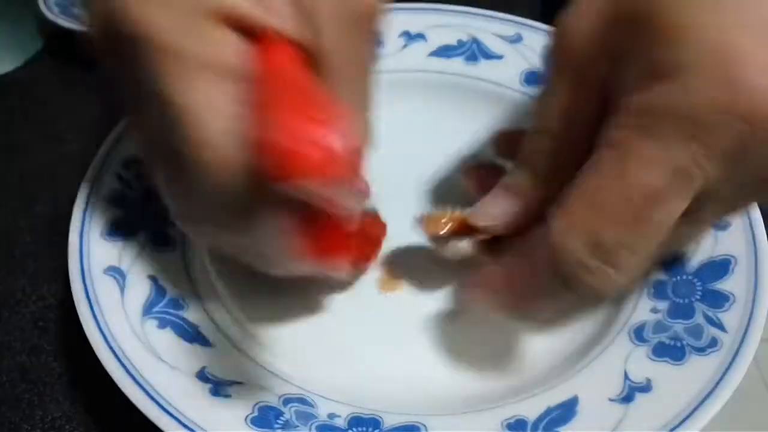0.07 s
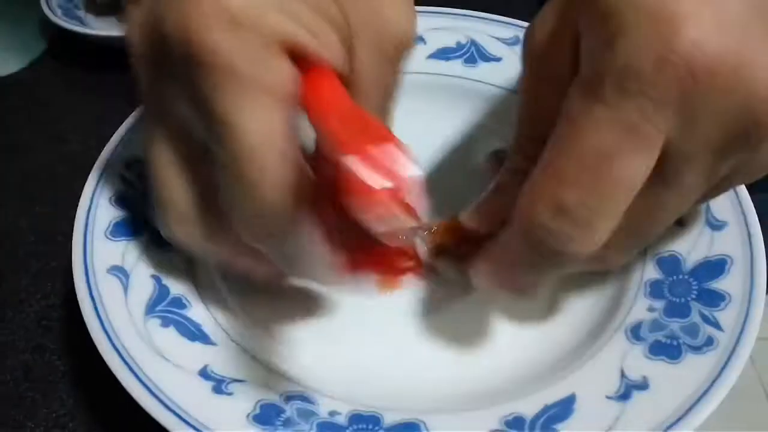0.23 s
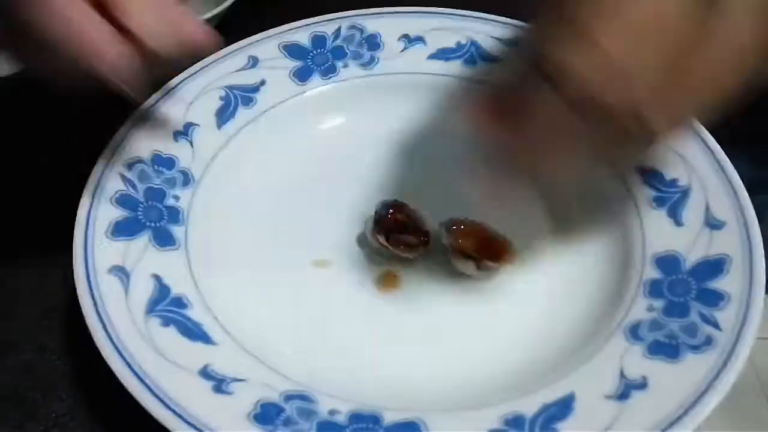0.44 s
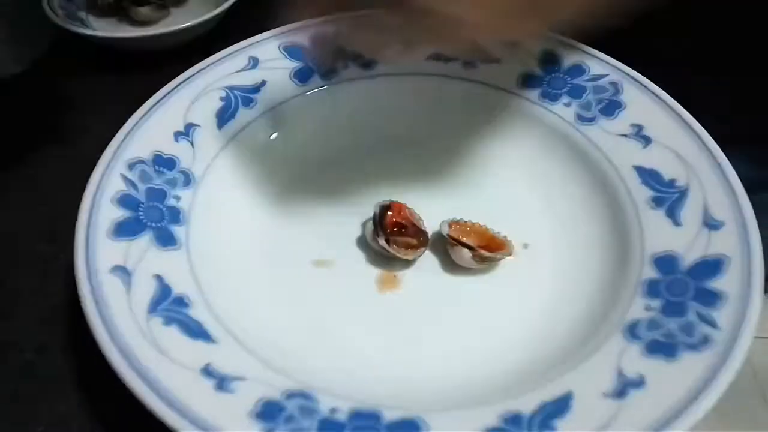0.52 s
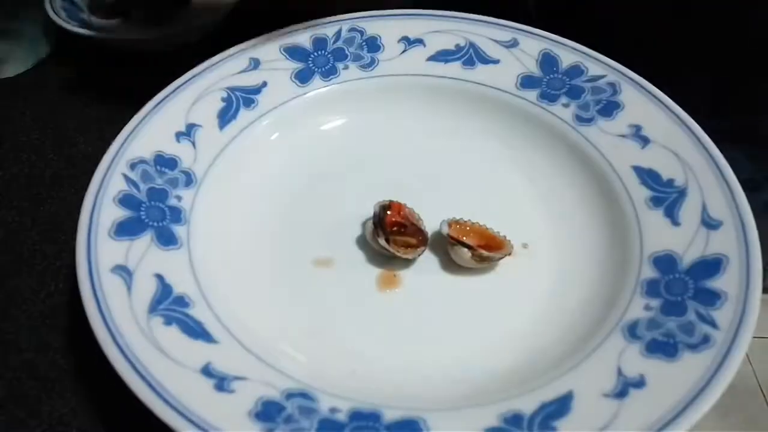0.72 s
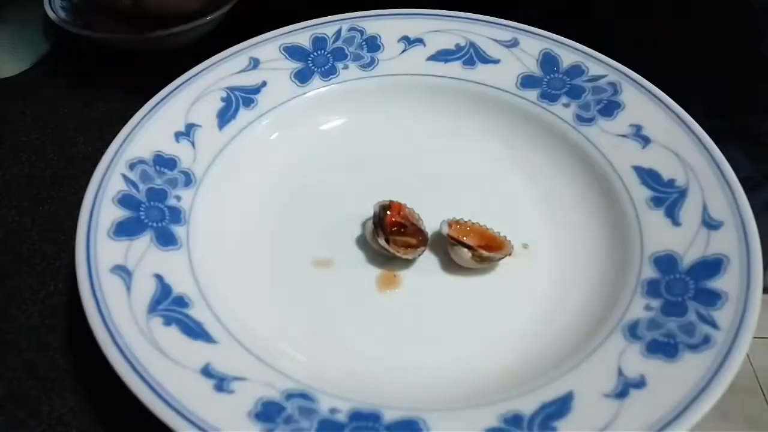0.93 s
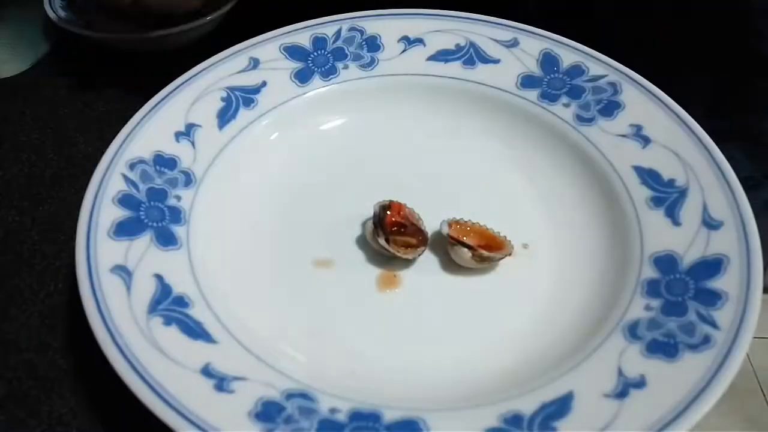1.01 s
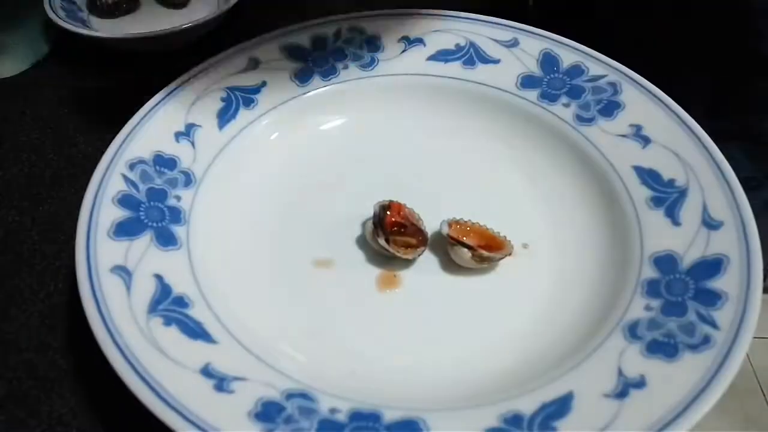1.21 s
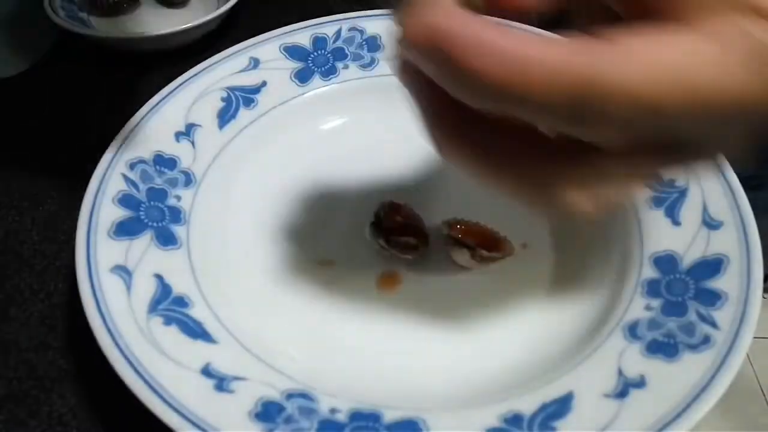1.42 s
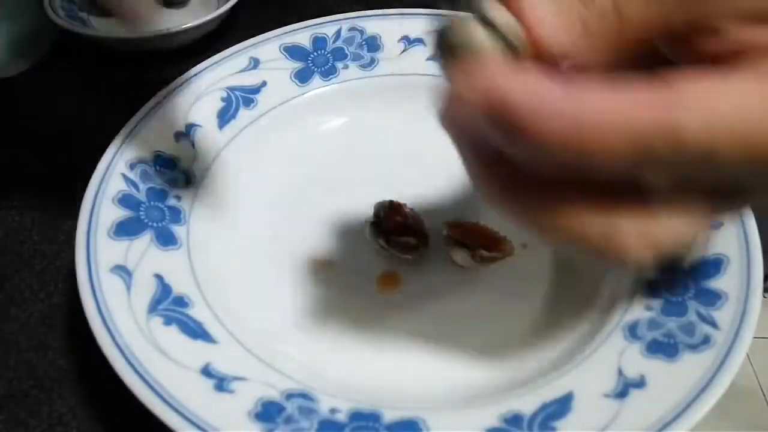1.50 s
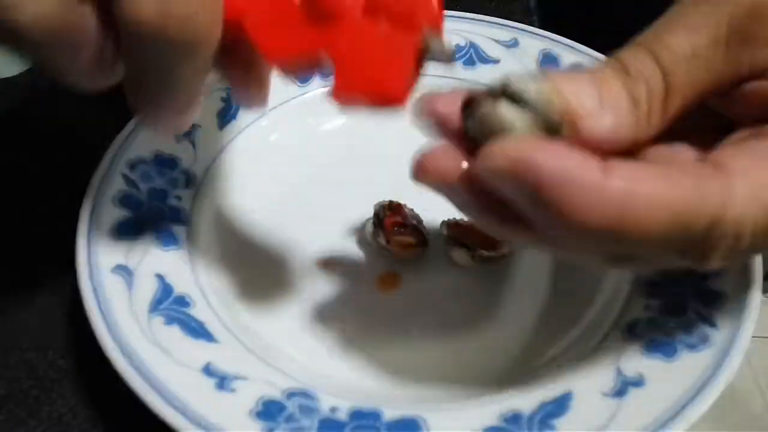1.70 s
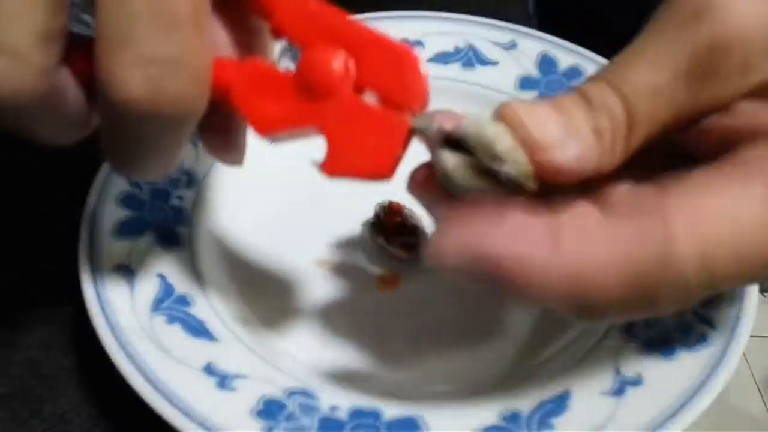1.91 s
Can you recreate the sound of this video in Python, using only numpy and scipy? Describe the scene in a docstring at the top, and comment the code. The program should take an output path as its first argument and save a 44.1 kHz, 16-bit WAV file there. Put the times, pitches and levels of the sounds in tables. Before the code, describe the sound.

Sharp ringing clinks sound close by as pliers and a shell knock on a ceramic plate. The shell drops, chatters and settles. A few faint ticks follow from further off, over a quiet low hum in a small hard room.

```python
"""In a small hard room, cockle shells are pried apart with small pliers on a ceramic plate. Tool and shell
knock on it, then a shell drops, chatters and settles. Each impact gives a broadband click and sets the
plate and the room around it ringing. Later a few faint ticks come from a bowl further off and
the pliers slide on to the next shell, all over a wavering low hum and hiss."""
import sys
import numpy as np
from scipy import signal
from scipy.fft import rfft, irfft, next_fast_len
from scipy.io import wavfile
from scipy.ndimage import uniform_filter1d, minimum_filter1d, map_coordinates

SR = 44100
rng = np.random.default_rng(int(sys.argv[2]) if len(sys.argv) > 2 else 0)


def generate_wav(signal):
    """Clip the signal to [-1, 1] and save it as 16-bit WAV at the path in sys.argv[1]."""
    frames = np.transpose(np.atleast_2d(signal))
    scaled = np.clip(frames, -1, 1) * 32767
    pcm = np.round(scaled).astype(np.int16)
    wavfile.write(sys.argv[1], SR, pcm)


N = 85995
TOP_HZ = 15500

# Likeness of the two ears for rumble, hiss and rub: frequency_hz, correlation
EAR_COHERENCE = [(100, 1), (250, 0.92), (600, .4), (2000, .2), (8000, 0.034)]


def amp(db):
    """Decibels to amplitude ratio."""
    return 10 ** (np.asarray(db) / 20)


def unit(x):
    """Normalisation to rms 1."""
    return x / np.sqrt(np.mean(x ** 2) + 1e-20)


def along(points, hz):
    """Interpolation of (frequency_hz, value) points on a logarithmic axis."""
    f, v = np.transpose(points)
    return np.interp(np.log(hz + 1), np.log(f + 1), v)


def envelope(points):
    """Amplitude envelope through (time_s, level_db) points."""
    return amp(np.interp(np.arange(N) / SR, *np.transpose(points)))


def wobble(rate):
    """Smooth random modulation: a spline with rate knots a second."""
    return map_coordinates(rng.standard_normal(int(N * rate / SR) + 4), [np.arange(N) * rate / SR])


def since(start_s):
    """Seconds since an onset, zero before it."""
    return np.maximum(np.arange(N) / SR - start_s, 0)


def sides(difference):
    """An interaural difference: plus half to the left, minus half to the right."""
    return np.array([[.5], [-.5]]) * difference


def filtered(x, response):
    """Linear filtering: the spectrum times a frequency response."""
    size = next_fast_len(N + SR // 4)
    return irfft(rfft(x, size) * response(np.fft.rfftfreq(size, 1 / SR)), size)[..., :N]


def minimum_phase(gain):
    """The causal response with these gains, by folding the cepstrum."""
    cepstrum = irfft(np.log(gain))
    half = cepstrum.shape[-1] // 2
    cepstrum[..., 1:half] *= 2
    cepstrum[..., half + 1:] = 0
    return np.exp(rfft(cepstrum))


def lowpass(x, hz):
    """Sixth-order roll-off above hz."""
    return signal.sosfilt(signal.butter(6, hz, fs=SR, output="sos"), x)


def noise(spectrum, coherence):
    """Partly coherent stereo noise of rms 1: the mid-to-side ratio sets the correlation."""
    def response(hz):
        angle = np.arccos(np.clip(along(coherence, hz), -1, 1)) / 2
        return amp(along(spectrum, hz)) * [np.cos(angle), np.sin(angle)]
    mid, side = filtered(rng.standard_normal((2, N)), response)
    return unit(np.array([mid + side, mid - side]))


def tone(hz, drift_hz, flutter_db=2.5):
    """A sinusoid of rms 1 under random amplitude and frequency modulation."""
    flutter = amp(flutter_db * wobble(18))
    phase = 2 * np.pi * np.cumsum(hz + drift_hz * wobble(22)) / SR
    return unit(flutter * np.sin(phase))


def background():
    """Superposition of a swelling hum, low drones, a faint whine, room rumble and hiss."""
    # Envelopes: time_s, level_db
    hum_level = [(0, -45.5), (.23, -47), (.31, -61.5), (.56, -57), (.75, -67.5), (1.04, -58.5), (1.15, -73),
                 (1.42, -48.5), (1.52, -72), (1.8, -54.5), (1.95, -74.5)]
    whine_level = [(0, -69), (.7, -68.5), (.9, -58.5), (1.05, -73), (1.42, -62), (1.6, -69.5),
                   (1.73, -64.5), (1.95, -69)]
    rumble_level = [(0, -51.5), (.3, -52.5), (.75, -55), (1.4, -55.5), (1.95, -54.5)]
    hiss_level = [(0, -62), (.25, -62), (.75, -65), (.93, -67.5), (.96, -62.5), (1.5, -64.5), (1.95, -64)]
    # Sustained tones: pitch_hz, level_db
    drone_tones = [(68, -67.5), (113, -61.5)]
    # Noise spectra: frequency_hz, gain_db
    rumble_spectrum = [(12, -47), (20, -17.5), (81, -13), (120, -1.5), (168, -12), (227, -13), (264, -14),
                       (350, -17), (384, -13.5), (422, -13), (455, -15.5), (967, -20.5), (1800, -32),
                       (2340, -60), (3960, -120)]
    hiss_spectrum = [(300, -5.5), (1500, 2.5), (2500, -2.5), (4000, -2), (6000, -0.5), (7200, -13.5),
                     (8500, -17), (12000, -27), (15500, -29.5)]
    # Balance of the low sounds: frequency_hz, left_minus_right_db
    balance = [(60, -1.5), (130, 4.5), (280, -1)]
    hum = envelope(hum_level) * tone(136.7, drift_hz=5)
    drones = sum(amp(db) * tone(hz, drift_hz=5) for hz, db in drone_tones)
    whine = envelope(whine_level) * tone(386.5, drift_hz=6)
    rumble = envelope(rumble_level) * noise(rumble_spectrum, EAR_COHERENCE)
    hiss = envelope(hiss_level) * noise(hiss_spectrum, EAR_COHERENCE)
    return filtered(hum + drones + whine + rumble, lambda hz: amp(sides(along(balance, hz)))) + hiss


def clicks(times, levels_db, spectrum, t60_s):
    """Impact noise: a harder contact cracks brighter, and the ribbed shell grates after each."""
    # Balance of the clicks: frequency_hz, left_minus_right_db
    balance = [(2500, 3), (5200, -6.5), (6500, 1), (8100, -5), (13000, 10.5)]
    # Likeness of the two ears: frequency_hz, correlation
    coherence = [(1000, 0.057), (3500, -0.25), (8000, 0)]
    soft_hz, hard_hz, rise_s = 8100, 15020, .0003
    scrape_db, scrape_t60_s = -14.5, .08
    force, t = np.zeros((2, N + SR)), np.arange(SR // 4) / SR
    for start_s, db in zip(times, levels_db):
        white = noise([(1, 0)], coherence)[:, :len(t)]
        hardness = amp(db - max(levels_db))
        cutoff_hz = soft_hz + (hard_hz - soft_hz) * hardness ** 3
        crack = lowpass(white * (1 - np.exp(-t / rise_s)) * amp(-60 * t / t60_s), cutoff_hz)
        grit = rng.standard_normal(white.shape) * amp(scrape_db - 60 * t / scrape_t60_s)
        force[:, round(start_s * SR):][:, :len(t)] += amp(db) * (crack + lowpass(grit, soft_hz))

    def response(hz):
        return minimum_phase(unit(amp(along(spectrum, hz) + sides(along(balance, hz)))))
    return filtered(force[:, :N], response)


def ringing(contacts, loose):
    """Damped oscillation: each contact hushes the last ring and starts anew; its spot weights the tones."""
    # Pitches that ring after each clink, from the plate and the room around it: pitch_hz
    pitches_hz = [3451, 3773, 3876, 3908, 5875, 6001, 6061, 6408, 7594, 7723, 9965, 10925, 13050, 14220,
                  15200]
    # For each pitch: t60_s, knocked_db, loose_shell_db, left_minus_right_db, left_lead_rad
    partials = [(0.057, -28.5, -24, -9, 2), (0.045, -3, -15.5, -1.5, 3.55), (.12, -6.5, -12.5, 3.5, 1.5),
                (0.084, -9, -1, -4, 2.5), (.24, -3.5, -7, 5, 2), (.15, -16.5, -11.5, 6, -3),
                (0.14, -7, -0.5, -18.5, -3), (0.31, -11, -26, 1.5, 1.8), (0.24, -0.5, -1.5, 13.5, 3.5),
                (.2, -5.5, -1.5, 7.5, 1.64), (0.24, -26, -17, 9.5, 1), (0.099, -1.5, 0, 19, 4.5),
                (.16, -4, -5.5, 9, 3.2), (.17, -10, -16, 16, 3), (.14, -14, -12.5, 13, 2)]
    # Borders of the low, middle, high and top registers: frequency_hz
    edges_hz = [5000, 7000, 10400]
    ring_db, rise_s, touch_s = 1.5, 0.00094, .003
    out, t = np.zeros((2, N + SR)), np.arange(SR // 3) / SR
    ends = [row[0] for row in contacts[1:]] + [N / SR]
    for (start_s, *register_db, _), end_s in zip(contacts, ends):
        free_s, start = end_s - start_s, round(start_s * SR)
        age = t[t < free_s + 10 * touch_s]
        attack = 1 - np.exp(-(age / rise_s) ** 2)
        damping = 1 / np.cosh(np.clip((age - free_s) / touch_s, 0, 20))
        phases = rng.uniform(0, 2 * np.pi, len(partials))
        for hz, (t60_s, knocked_db, loose_db, pan_db, lead), phase in zip(pitches_hz, partials, phases):
            db = ring_db + register_db[np.searchsorted(edges_hz, hz)] + (loose_db if loose else knocked_db)
            partial = amp(db - 60 * age / t60_s) * np.sin(2 * np.pi * hz * age + phase + sides(lead))
            out[:, start:start + len(age)] += unit(amp(sides(pan_db))) * attack * damping * partial
    return out[:, :N]


def room(x, wall_delay_s=.003):
    """Diffuse reverberation: convolution with exponentially decaying noise, one tail per ear."""
    # Reverberation time: frequency_hz, t60_s
    decay = [(300, 0.9), (2500, 0.14), (6000, 0.18), (12000, 0.15)]
    hz, t, spectra = signal.stft(rng.standard_normal((2, SR // 2)), SR, nperseg=256)
    tail = signal.istft(spectra * amp(-60 * t / along(decay, hz)[:, None]), SR, nperseg=256)[1]
    tail *= np.arange(tail.shape[1]) / SR > wall_delay_s
    return signal.fftconvolve(x, tail / np.linalg.norm(tail[0]), axes=1)[:, :N]


def clinks(contacts, spectrum, click_db, click_t60_s, loose):
    """Direct and reverberant sound of impacts on the plate, each a click and a ring."""
    click_room_db, ring_room_db = -7, -12.5
    times, *_, levels_db = np.transpose(contacts)
    click = amp(click_db) * clicks(times, levels_db, spectrum, click_t60_s)
    ring = ringing(contacts, loose)
    return click + ring + room(amp(click_room_db) * click + amp(ring_room_db) * ring)


def plier_knocks():
    """Impulsive excitation: the pliers and the held shell strike the plate."""
    # Knocks: start_s, low_ring_db, middle_ring_db, high_ring_db, top_ring_db, click_db
    knocks = [(0.2252, -37, -47, -56, -71, -50.5), (0.2325, -10, -12.5, -30.5, -44, -16.5),
              (0.2492, -13.5, -23.5, -27, -53.5, -25.5), (0.2558, -11, -20, -28.5, -54, -18.5),
              (0.2662, -10.5, -19.5, -26, -51, -20), (0.2702, -13, -18, -29, -52, -19),
              (0.319, -20, -31.5, -41.5, -77, -36.5), (0.3383, -15.5, -31, -44.5, -81, -25),
              (0.3475, -15.5, -31.5, -46, -81, -28), (0.3645, -30.5, -35.5, -50.5, -82, -31)]
    # Click spectrum: frequency_hz, gain_db
    spectrum = [(200, -29.5), (900, -22), (1750, -23), (2250, 3), (3100, -12.5), (3800, 6.5), (4800, -4),
                (5700, 2), (7200, -8.5), (8400, -23), (13000, -27), (15500, -37.5)]
    return clinks(knocks, spectrum, click_db=2.5, click_t60_s=0.023, loose=False)


def dropped_shell():
    """Inelastic collisions: the loose shell bounces and rocks to rest on the plate."""
    # Bounces: start_s, low_ring_db, middle_ring_db, high_ring_db, top_ring_db, click_db
    bounces = [(0.3848, -12.5, -12, -22, -48, -22), (0.409, -14.5, -15.5, -30, -57, -25.5),
               (0.4253, -22, -22, -39.5, -66, -30.5), (0.4365, -29, -14.5, -32, -70, -31),
               (0.456, -19, -23, -38, -67, -34), (0.465, -12.5, -17, -28.5, -51, -25),
               (0.4752, -6.5, -7, -30, -51.5, -20), (0.4973, -6.5, -14.5, -30.5, -62.5, -25),
               (0.5147, -8, -5, -25, -65.5, -27.5), (0.5293, -23, -17.5, -35.5, -77, -34.5),
               (0.572, -39, -42, -68, -90.5, -47.5), (0.604, -33, -31, -47, -82, -44),
               (0.6085, -21.5, -21.5, -58, -87, -47), (0.619, -22.5, -27.5, -46, -92, -40.5),
               (0.643, -34.5, -38, -58.5, -96, -49), (0.6755, -49.5, -46, -70, -91, -69)]
    # Click spectrum: frequency_hz, gain_db
    spectrum = [(200, -28.5), (1100, -15), (1700, -17.5), (2500, -8.5), (3700, 0.5), (4500, -4), (5700, 4),
                (7500, -8.5), (9000, -11), (11000, -31.5), (13000, -30.5), (15500, -47.5)]
    return clinks(bounces, spectrum, click_db=9, click_t60_s=0.0077, loose=True)


def bowl_ticks(ring_t60_s=0.13, room_db=-3):
    """Light impacts, each with one damped tone, as the next shell is picked from the far bowl."""
    # Ticks: start_s, click_db, ring_hz, ring_db
    ticks = [(1.036, -45, 2070, -65.5), (1.073, -49.5, 5820, -58.5), (1.152, -57.5, 3040, -60.5)]
    # Click spectrum: frequency_hz, gain_db
    spectrum = [(500, -17), (1500, -12), (2100, 11), (3200, -9), (6000, -8), (8500, -26), (10200, -14),
                (12000, -34)]
    times, levels_db, *_ = np.transpose(ticks)
    direct = clicks(times, levels_db, spectrum, t60_s=0.022)
    for start_s, _, hz, db in ticks:
        age = since(start_s)
        direct += amp(db - 60 * age / ring_t60_s) * np.sin(2 * np.pi * hz * age)
    return direct + amp(room_db) * room(direct)


def plier_rub(start_s=1.86, rise_s=0.058, level_db=-62):
    """Sliding friction: steel on the next shell gives a faint narrow band of noise."""
    # Friction spectrum: frequency_hz, gain_db
    spectrum = [(3000, -20), (4800, -9), (5900, 2), (6500, -12), (7600, -26), (12000, -45)]
    onset = np.clip(since(start_s) / rise_s, 0, 1)
    return amp(level_db + 2 * wobble(70)) * onset * noise(spectrum, EAR_COHERENCE)


def scene():
    """Superposition: the pressures of all the sources add."""
    return background() + plier_knocks() + dropped_shell() + bowl_ticks() + plier_rub()


def record(dry, ceiling=.87, smoothing_s=.004):
    """Peak limiting holds the loudest clinks down; band limiting removes all above TOP_HZ."""
    needed = ceiling / np.maximum(np.abs(dry).max(axis=0), ceiling)
    size = round(smoothing_s * SR)
    gain = uniform_filter1d(minimum_filter1d(needed, 2 * size), size)
    return filtered(dry * gain, lambda hz: hz < TOP_HZ)


dry = scene()
out = record(dry)
generate_wav(out)
```